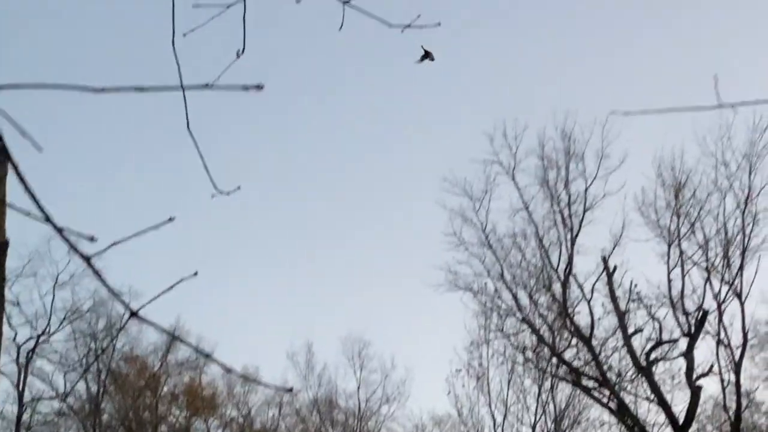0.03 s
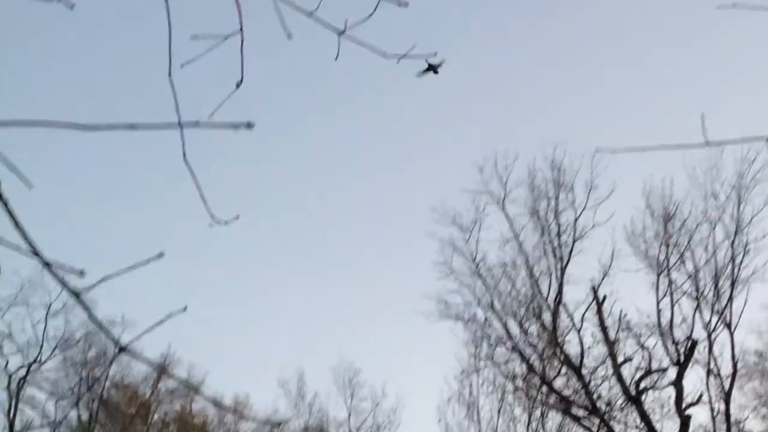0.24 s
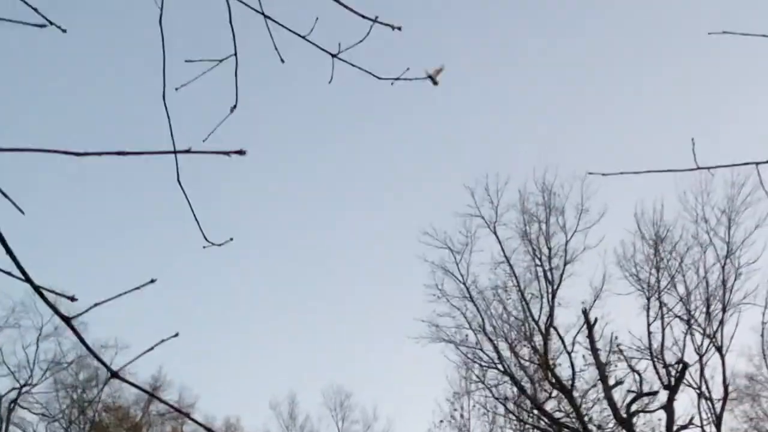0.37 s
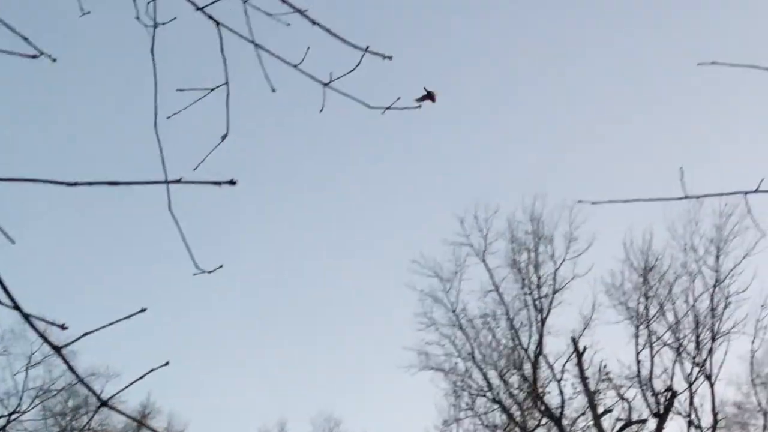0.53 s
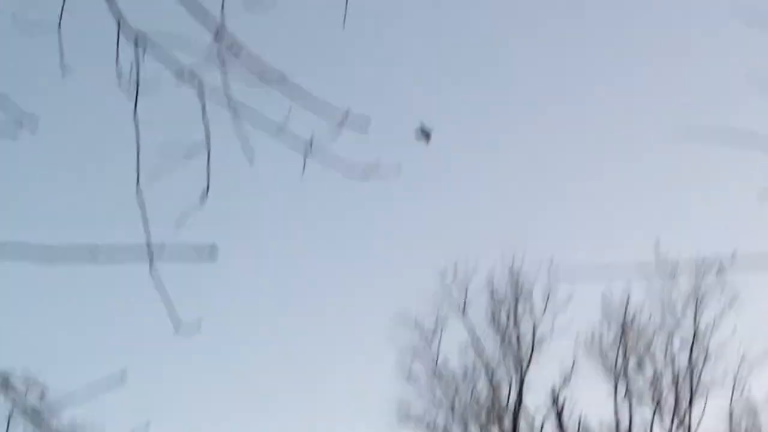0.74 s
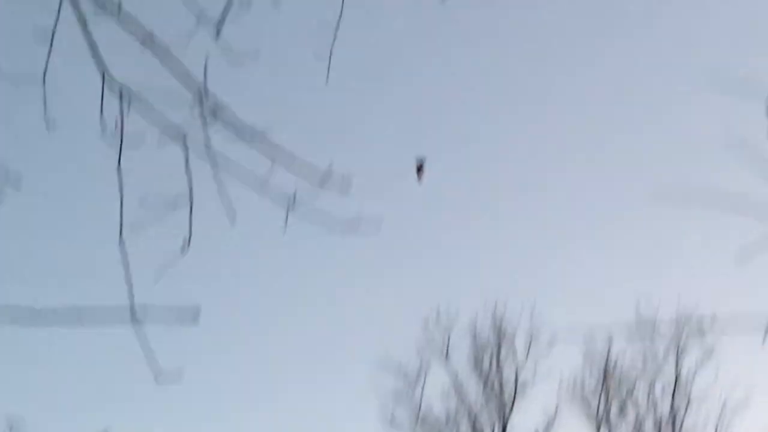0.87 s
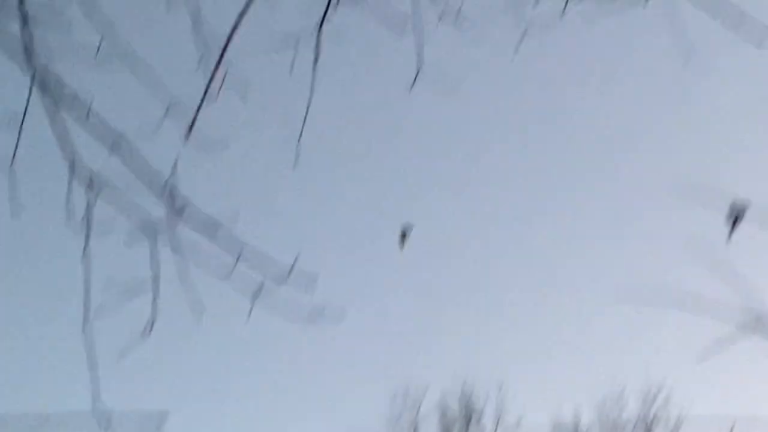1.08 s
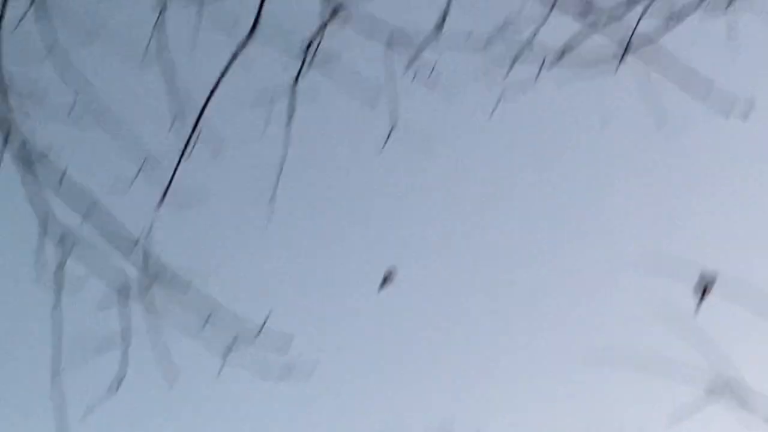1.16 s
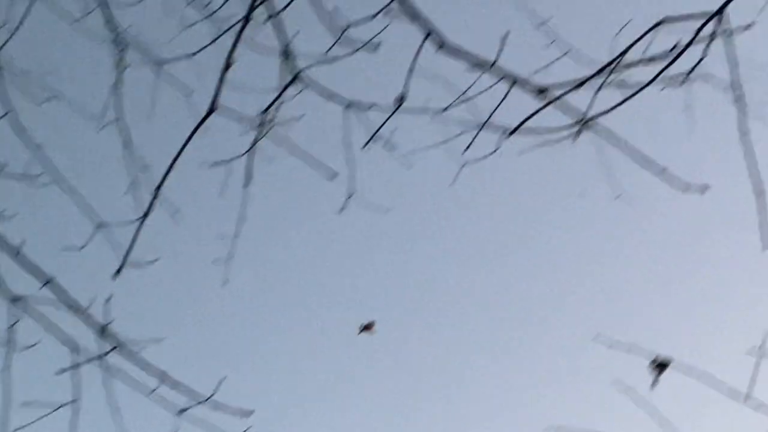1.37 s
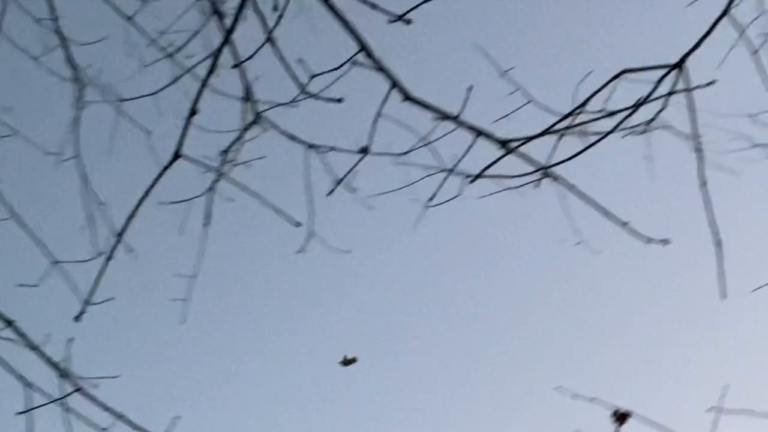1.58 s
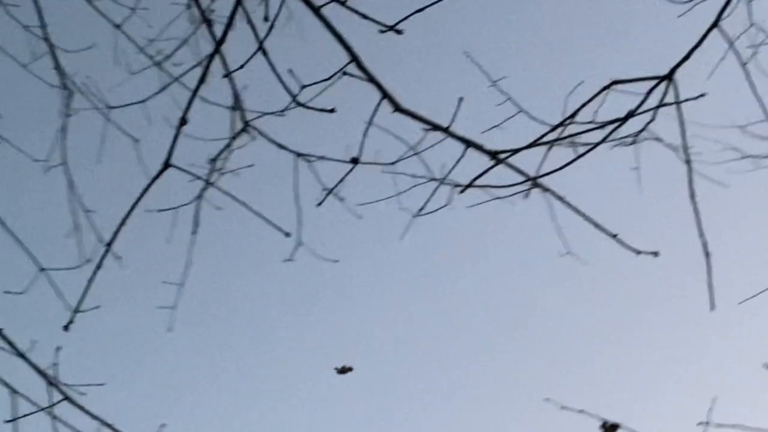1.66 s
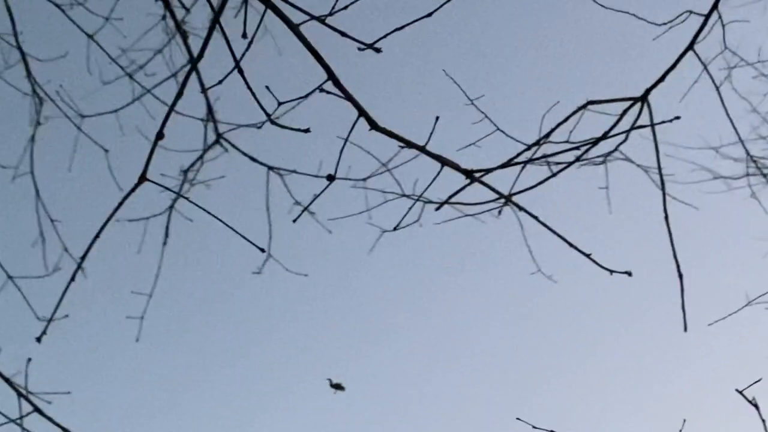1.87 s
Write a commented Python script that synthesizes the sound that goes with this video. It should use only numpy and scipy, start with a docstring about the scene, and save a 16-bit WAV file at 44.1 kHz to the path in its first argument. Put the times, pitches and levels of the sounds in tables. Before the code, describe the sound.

A shotgun fires twice in quick succession, the echo fading among the trees.

```python
"""Flooded woodland, over a low outdoor rumble. Two shotgun blasts come from the left, a fifth of a
second apart, each a crack that drops into a thump, hollowed by its bounce off the water.
Nearby trunks scatter each as a bright rush, big trunks and tree lines throw back separate echoes,
and the forest rolls on, ever duller. A faint thin whistle enters at the very end."""
import sys
import numpy as np
from scipy import signal
from scipy.fft import rfft, irfft, next_fast_len
from scipy.io import wavfile

SR = 44100
rng = np.random.default_rng(int(sys.argv[2]) if len(sys.argv) > 2 else 0)


def put_to_file(sound):
    """Save the sound as 16-bit audio at rate SR, in the file named by the first command-line argument."""
    columns = np.atleast_2d(sound).T  # one column per channel
    safe = np.clip(columns, -1, 1)
    whole_steps = np.round(safe * 32767)
    wavfile.write(sys.argv[1], SR, whole_steps.astype(np.int16))


N = 83790
T = np.arange(N) / SR
FFT_SIZE = next_fast_len(N + SR // 2)
HZ = np.maximum(np.arange(FFT_SIZE // 2 + 1) * SR / FFT_SIZE, 1)
LAG_S = .00073  # right channel behind left, for sound from the guns' side

# Shots. Each row: start in seconds, blast gain in dB, crack gain in dB, near scatter gain in dB,
# scatter hold in seconds, forest echo gain in dB.
SHOTS = [(0.219, 27, -19.5, -33, 0.008, -24), (0.4283, 37, -16.5, -20.5, 0.038, -25.5)]
# Separate echoes. Each row: arrival in seconds, gain in dB, centre in Hz, width in octaves,
# side from -1 (right) to 1 (left), gain in dB of the rush that follows.
ECHOES = [(0.243, 12.5, 1170, 0.34, 0.91, -45), (0.302, 22, 122, 0.89, 0.78, -35),
          (.311, 13, 1210, 0.24, 0.81, -39), (0.3354, 33.5, 137, 0.54, 1, -40),
          (.4235, 25.5, 620, 0.11, 0.36, -21), (.4435, 22, 900, 0.49, 0.55, -17),
          (0.472, -6, 2410, 0.95, 0.39, -19.5), (.480, 32.5, 750, 0.06, -0.45, -22),
          (0.482, 9, 1600, 1, -0.66, -33.5), (0.484, 26.5, 1217, 0.04, 0.055, -41),
          (.496, 23.5, 580, 0.16, 0.14, -34), (0.6252, 31, 105, 0.47, 1, -29.5),
          (.645, 23, 580, 0.065, 0.45, -40), (0.664, 17.5, 187, 0.92, 0.44, -41),
          (0.8564, 31, 146, 0.34, 0.48, -39.5), (.899, 22, 494, 0.17, 0.2, -44),
          (0.901, 16, 1030, 0.21, .1, -40.5), (0.9455, 33.5, 130, 0.31, 0.43, -44),
          (1.0305, 26, 115, 0.8, -0.12, -47), (1.385, 23, 71, 0.87, 0.15, -76)]


def from_db(db):
    """Decibels to gain."""
    return 10 ** (np.asarray(db) / 20)


def at_hz(points, hz):
    """Read a table on a log-frequency axis."""
    points_hz, values = np.transpose(points)
    return np.interp(np.log(hz), np.log(points_hz), values)


def to_samples(spectrum):
    """Spectrum to N samples."""
    return irfft(spectrum, FFT_SIZE)[..., :N]


def delay(seconds):
    """Spectrum of a delay."""
    return np.exp(-2j * np.pi * HZ * seconds)


def stereo_lag(lag_s):
    """Stereo spectrum that delays the right channel."""
    return np.array([delay(0), delay(lag_s)])


def bass_cut(edge_hz):
    """Gain of a second-order high-pass."""
    return 1 / np.sqrt(1 + (edge_hz / HZ) ** 4)


def smear(cycles=1.205, top_hz=960):
    """Lows lag by about `cycles` periods below top_hz: a pulse becomes a fast falling sweep."""
    return np.exp(-2j * np.pi * cycles * np.log(HZ / (HZ + top_hz)))


def colour(points):
    """Gain curve from a dB table, bass cut, scaled to rms 1."""
    gain = from_db(at_hz(points, HZ)) * bass_cut(49)
    return gain / np.sqrt(np.mean(gain ** 2))


def blend(first, second, share):
    """Mix that gives `share` of the power to the first signal."""
    return np.sqrt(share) * first + np.sqrt(1 - share) * second


def burst_power(start_s, db, rise_s, hold_s, t60_s):
    """Power envelope: attack, hold, release."""
    attack = np.clip((T - start_s) / rise_s, 0, 1)
    return attack * from_db(db - 60 * np.maximum(T - start_s - hold_s, 0) / t60_s) ** 2


def reflections(trunks_per_s=5000, spread_db=2.5):
    """Spectrum of many small trunk reflections, random in time and strength."""
    clicks = (rng.random(FFT_SIZE) < trunks_per_s / SR) * rng.choice([-1, 1], FFT_SIZE)
    clicks = clicks * from_db(spread_db * np.clip(rng.standard_normal(FFT_SIZE), -2, 2))
    return rfft(clicks / clicks.std()) * smear()


def all_round():
    """Stereo spectrum of reflections from every side."""
    # Diffuse field. Each row: frequency in Hz, left-right correlation.
    correlations = [(40, 0.96), (110, 0.84), (220, 0.19), (400, -0.033), (600, -0.44), (780, -0.57),
                    (1200, 0.62), (1700, -0.12), (3300, 0.58), (4300, -0.5), (8000, -0.037)]
    correlation = at_hz(correlations, HZ)
    mid = np.sqrt((1 + correlation) / 2) * reflections()
    side = np.sqrt((1 - correlation) / 2) * reflections()
    return np.array([mid + side, mid - side])


def rumble():
    """Low, steady outdoor background."""
    # Rumble spectrum. Each row: frequency in Hz, relative density in dB.
    tone = [(25, 19.5), (60, -6), (120, 3.5), (250, -13), (500, -14.5), (1000, -27), (2000, -47),
            (4000, -53.5), (9000, -71)]
    return from_db(-38) * to_samples(colour(tone) * all_round())


def blasts(bounce_gain=0.57):
    """Direct muzzle blasts, comb-filtered by their bounce off the water."""
    # Blast spectra, one list per shot. Each row: frequency in Hz, relative level in dB.
    tones = [
        [(30, -9.5), (65, 3.5), (130, 4), (210, -9.5), (280, 3), (420, -0.5), (600, -17), (850, -3),
         (1200, -28.5), (2000, -29.5), (3300, -30), (9000, -65)],
        [(30, 1.5), (65, -1), (130, 0), (250, -12.5), (380, -7.5), (600, -2.5), (950, -6.5), (1400, -17),
         (2000, -34), (3300, -30.5), (9000, -68)],
    ]
    # Shot paths. Each row: lag of the lows in cycles, onset of that lag in Hz,
    # water bounce delay in seconds, left over right in dB.
    paths = [(1.82, 220, .00083, -1), (1.32, 980, .0005, 2.5)]
    out = 0
    for (start_s, db, *_), tone, (cycles, top_hz, bounce_s, pan_db) in zip(SHOTS, tones, paths):
        pulse = from_db(db + at_hz(tone, HZ)) * bass_cut(30) * smear(cycles, top_hz) * delay(start_s)
        water = 1 + bounce_gain * delay(bounce_s)
        pan = from_db([[pan_db / 2], [-pan_db / 2]]) * stereo_lag(LAG_S)
        out = out + pulse * water * pan
    return to_samples(out)


def cracks():
    """Ragged snap at the front of each blast."""
    # Crack spectrum. Each row: frequency in Hz, relative density in dB.
    tone = [(150, -9), (600, -14), (1200, 11.5), (1600, -10.5), (1950, 15.5), (2250, 4.5), (2550, -7),
            (2950, -8.5), (3300, 16.5), (4000, -15), (4700, -12.5), (8500, -19.5)]
    power = sum(burst_power(start_s, db, rise_s=.002, hold_s=.003, t60_s=.04)
                for start_s, _, db, *_ in SHOTS)
    return np.sqrt(power) * to_samples(colour(tone) * reflections() * stereo_lag(LAG_S))


def near_scatter(rise_s=0.013):
    """Trunks and twigs on both sides turn each blast and echo into a bright, fast-dying rush."""
    # Scatter spectrum. Each row: frequency in Hz, relative density in dB.
    tone = [(40, -9.5), (120, 5), (250, -2.5), (400, -0.5), (800, 4), (1500, -4), (2500, -8.5), (4000, -6),
            (5000, -10.5), (8500, -20.5)]
    power = sum(burst_power(start_s, db, rise_s, hold_s, t60_s=0.45)
                for start_s, _, _, db, hold_s, _ in SHOTS)
    power += sum(burst_power(start_s, db, rise_s, hold_s=0, t60_s=0.1) for start_s, *_, db in ECHOES)
    left, right = (reflections(trunks_per_s=900, spread_db=4.5) * stereo_lag(lag_s)
                   for lag_s in (LAG_S, -.00036))
    trunks = blend(left, right, share=0.31)
    return np.sqrt(power) * to_samples(colour(tone) * blend(trunks, all_round(), share=0.31))


def waver(top_hz=12.7):
    """Slow random swing, standard deviation 1."""
    noise = rfft(rng.standard_normal(FFT_SIZE))
    swing = to_samples(noise * np.exp(-(HZ / top_hz) ** 2) * bass_cut(1.2))
    return swing / swing.std()


def forest_echo(aim_fade_s=0.28, far_after_s=0.4, rise_cycles=12):
    """Long rolling echo: spreads from the guns' side to all sides and loses its treble first."""
    # Echo spectrum. Each row: frequency in Hz, relative density in dB.
    tone = [(30, -25.5), (65, -4), (125, 1), (190, -1.5), (290, -7.5), (550, -6), (1150, -13.5),
            (1800, -18), (2700, -23), (4000, -25.5), (5000, -33.5), (8500, -48.5)]
    # Decay before the far-path loss. Each row: frequency in Hz, T60 in seconds.
    decay = [(50, 18), (130, 6.2), (400, 6.6), (1000, 6.65), (2000, 4), (4000, 3.33), (8000, 6.4)]
    # Swells of the roll. Each row: time in seconds, gain in dB.
    roll = [(.22, -2.5), (.36, 2), (.55, -3), (.72, -3), (.9, 2), (1.15, 3), (1.4, 2), (1.65, 2.5),
            (1.9, 1.5)]
    aimed, diffuse = reflections() * stereo_lag(LAG_S), all_round()
    aimed_share = 0.5 * np.exp(-np.maximum(T - SHOTS[0][0], 0) / aim_fade_s)
    centres_hz = 20 * 2 ** np.arange(0, 9.6, .5)
    out = 0
    for hz, one_hot in zip(centres_hz, np.eye(len(centres_hz))):
        band = colour(tone) * np.interp(np.log(HZ), np.log(centres_hz), one_hot)
        rise_s = 0.0027 + rise_cycles / hz  # lows build up last
        power = 0
        for start_s, *_, db in SHOTS:
            age_s = np.maximum(T - start_s, 0)
            far_loss_db = 30.5 * hz / 4900 * np.maximum(age_s - far_after_s, 0)
            loss_db = 60 * age_s / at_hz(decay, hz) + far_loss_db
            power = power + np.minimum(age_s / rise_s, 1) * from_db(db - loss_db) ** 2
        patchy_db = 1.77 * waver() / (1 + hz / 3500)  # clumps of trees and clearings
        wash = blend(to_samples(band * aimed), to_samples(band * diffuse), aimed_share)
        out = out + np.sqrt(power) * from_db(patchy_db) * wash
    return out * from_db(np.interp(T, *np.transpose(roll)))


def echoes():
    """Big trunks return hard slaps, tree lines dull thumps; the narrowest bands ring briefly."""
    out = 0
    for arrival_s, db, centre_hz, width_oct, side, _ in ECHOES:
        band = np.exp(-.5 * (np.log2(HZ / centre_hz) / width_oct) ** 2)
        out = out + from_db(db) * band * smear() * delay(arrival_s) * stereo_lag(LAG_S * side)
    return to_samples(out)


def whistle(start_s=1.853, rise_s=0.056, tone_hz=3990, rasp_hz=3450, rasp_width_hz=200):
    """Faint, thin high tone with a rough band below it."""
    swell = np.clip((T - start_s) / rise_s, 0, 1)
    tone = np.sin(2 * np.pi * tone_hz * T)
    rasp_band = np.exp(-((HZ - rasp_hz) / rasp_width_hz) ** 2)
    rasp = to_samples(rfft(rng.standard_normal(FFT_SIZE)) * rasp_band)
    return swell * (from_db(-53.5) * tone + from_db(-65) * rasp / rasp.std())


def scene():
    """Stereo sum of shots, reflections and background."""
    return blasts() + cracks() + echoes() + near_scatter() + forest_echo() + rumble() + whistle()


def record(dry):
    """Soft clipping, then a steep low-pass."""
    ceiling, cutoff_hz = 1.15, 9100
    low_pass = signal.ellip(10, .3, 80, cutoff_hz, fs=SR, output="sos")
    return signal.sosfilt(low_pass, ceiling * np.tanh(dry / ceiling))


dry = scene()
out = record(dry)
put_to_file(out)
```